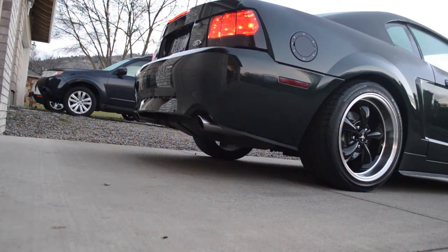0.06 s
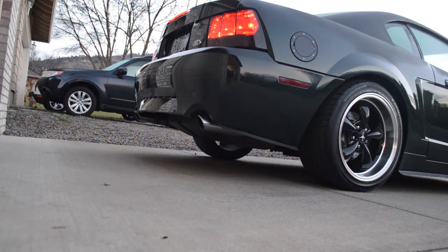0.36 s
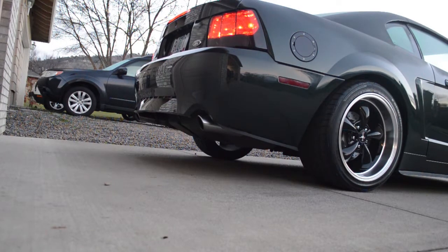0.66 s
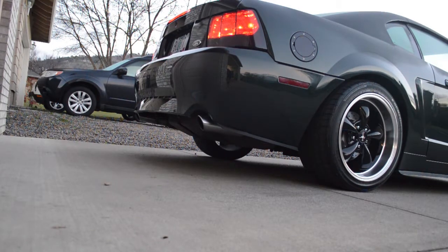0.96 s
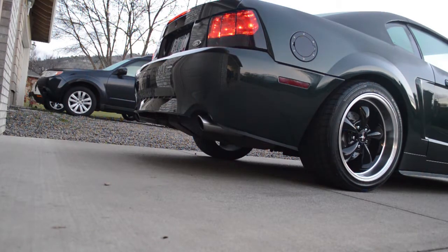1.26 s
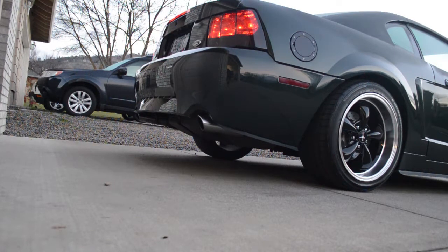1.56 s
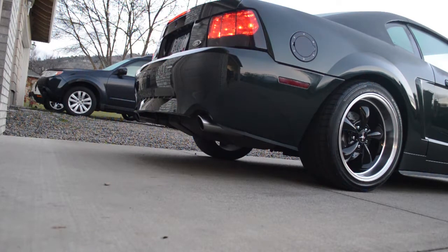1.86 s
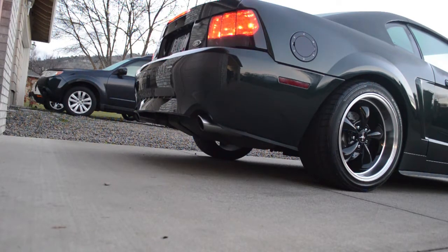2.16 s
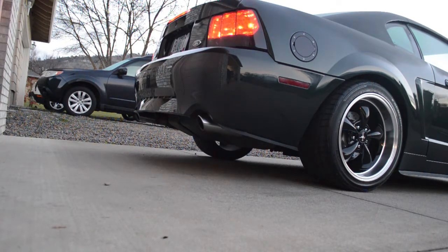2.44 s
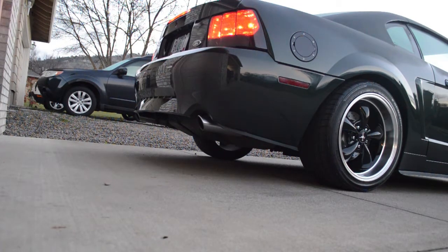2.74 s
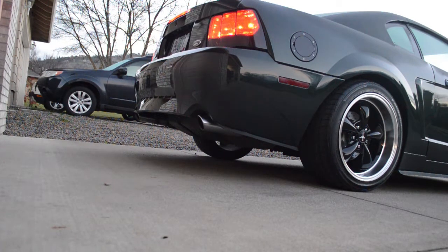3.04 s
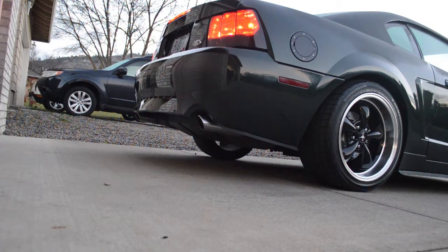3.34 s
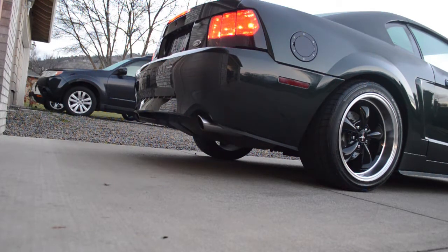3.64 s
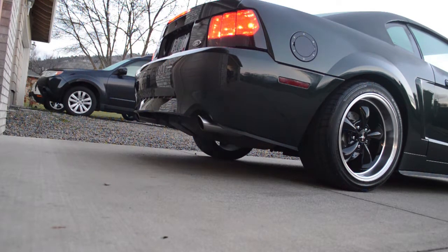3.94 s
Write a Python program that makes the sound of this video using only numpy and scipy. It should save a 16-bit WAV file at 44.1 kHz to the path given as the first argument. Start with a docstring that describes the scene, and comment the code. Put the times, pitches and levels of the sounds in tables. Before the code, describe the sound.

A V8 car engine starts, heard beside the tailpipe on a driveway. For the first second a faint fuel pump whines in quiet air. At 1 second the starter clacks in and grinds. Near 1.8 seconds the engine catches with a metallic rattle, barks loudly at 2.1 and flares with a few pops. From about 3 seconds it settles into a loud, lumpy idle until 4 seconds.

```python
"""A V8 car's cold start

Beside the tailpipe, on a driveway, the fuel pump whines. The starter slams in and its gear teeth grind
against each compression (a piston squeezing air). The engine catches with a metallic rattle and a bark,
flares roughly and settles into a loud, lumpy idle as eight unequal cylinders puff through the pipe."""
import sys
import numpy as np
from scipy import signal
from scipy.fft import rfft, irfft, next_fast_len
from scipy.io import wavfile
from scipy.ndimage import uniform_filter1d, map_coordinates

SR = 44100
rng = np.random.default_rng(int(sys.argv[2]) if len(sys.argv) > 2 else 0)


def unload_wav(signal):
    """Save mono or channel-first audio to the path in sys.argv[1] as 16-bit WAV at rate SR, clipped to [-1, 1]."""
    wavfile.write(
        sys.argv[1],
        SR,
        np.round(np.clip(np.atleast_2d(signal).T, -1, 1) * 32767).astype(np.int16),
    )


N = 176400
T = np.arange(N) / SR

# bright tone colour of struck engine metal: f/Hz, level/dB
METAL_COLOUR = [(2000, -5), (3500, -15), (4500, -2), (5100, -7.5), (6000, 0), (7400, -4.5), (9000, 1.5),
                (10200, -3.5), (11500, -9), (15500, -28)]


def amp(db):
    """Turn decibels into a gain."""
    return 10 ** (np.asarray(db) / 20)


def unit(x):
    """Scale to an average (rms) level of 1."""
    return x / np.sqrt(np.mean(x ** 2) + 1e-20)


def sine(turns):
    """A pure tone with one wave per turn."""
    return np.sin(2 * np.pi * turns)


def curve(rows, axis=1):
    """Follow one column of a table over time."""
    rows = np.array(rows)
    return np.interp(T, rows[:, 0], rows[:, axis])


def level(rows):
    """Gain from rows of t/s, level/dB, fading in just before the first."""
    return amp(curve(rows)) * np.clip((T - rows[0][0]) / .01 + 1, 0, 1)


def wobble(rate):
    """A smooth curve through `rate` random values a second."""
    return map_coordinates(rng.standard_normal(4000), [T * rate], mode="wrap")


def colour(x, points):
    """Filter a sound to the tone colour given by rows of f/Hz, level/dB."""
    size = 2 * next_fast_len(N // 2 + 8192)
    f, db = np.transpose(points)
    hz = np.fft.rfftfreq(size, 1 / SR)
    log_response = irfft(np.log(amp(np.interp(np.log(hz + 1), np.log(f + 1), db))))
    # make the filter ring after each hit, never before
    log_response[1:size // 2] *= 2
    log_response[size // 2 + 1:] = 0
    return irfft(rfft(x, size) * np.exp(rfft(log_response)))[:N]


def noise(points):
    """Noise of the given tone colour, at an average level of 1."""
    return unit(colour(rng.standard_normal(N), points))


def steady(x, span_s=0.27):
    """Even out slow changes in loudness."""
    power = np.abs(uniform_filter1d(uniform_filter1d(x * x, int(span_s * SR)), int(span_s * SR / 2)))
    return x / np.sqrt(power + power.mean() / 1000)


def beats(turns):
    """The samples at which a running count passes a whole number."""
    return np.flatnonzero(np.diff(np.floor(turns)) > 0)


def pulses(at, sizes):
    """Sharp clicks that may fall between samples."""
    taps = np.floor(at).astype(int)[:, None] + np.arange(-7, 9)
    offset = taps - at[:, None]
    clicks = sizes[:, None] * np.sinc(offset) * np.sinc(offset / 8)
    return np.bincount(np.clip(taps, 0, N).ravel(), clicks.ravel(), N + 1)[:N]


def blows(rows, fade_s, attack_s=.001):
    """Gain of sudden hits that each die away by 60 dB in fade_s."""
    ages = [(np.maximum(T - s, 0), db) for s, db in rows]
    return np.sqrt(sum((amp(db - 60 * t / fade_s) * (1 - np.exp(-t / attack_s))) ** 2 for t, db in ages))


def fuel_pump(stop_s=.82):
    """The pump primes the engine with two sagging whines, a few steady tones and a hiss."""
    # its high and low whines: t/s, f/Hz, level/dB
    high_whine = [(0, 9650, -53), (.2, 9400, -53), (.33, 8920, -56), (.5, 8650, -56), (.78, 7800, -76),
                  (.82, 7650, -90)]
    low_whine = [(0, 3150, -67), (.22, 3060, -62), (.45, 2900, -65), (.7, 2830, -71), (0.919, 2880, -59),
                 (1.05, 2880, -90)]
    # its steady tones and the colour of its hiss: f/Hz, level/dB
    steady_tones = [(2030, -68), (5980, -71), (8580, -63), (9570, -61)]
    hiss_colour = [(1470, -43), (2500, -19), (3060, -13), (3480, -20), (4450, -13), (7300, -8.5),
                   (7930, -4), (8550, 1), (9420, -1), (15000, -18)]
    whine = 0
    for rows in (high_whine, low_whine):
        pitch_hz = curve(rows) * (1 + 0.0184 * wobble(900))
        whine += amp(curve(rows, axis=2)) * sine(np.cumsum(pitch_hz) / SR)
    tones = sum(amp(db + 2 * wobble(11)) * np.sin(2 * np.pi * hz * T + wobble(200))
                for hz, db in steady_tones)
    running = np.clip((stop_s - T) / .03, 0, 1)
    return whine + (amp(-54) * noise(hiss_colour) + tones) * running


def yard(hum_hz=144):
    """Quiet outdoor air with a low hum."""
    # colour of the air: f/Hz, level/dB
    air_colour = [(15, -36), (25, -14), (112, -9.5), (150, -9.5), (293, -14.5), (335, -18), (427, -15),
                  (501, -19), (1910, -24), (2430, -29.5), (2850, -26), (3630, -31.5), (15000, -38.5)]
    hum = amp(-47.5 + 0.2 * wobble(8)) * (sine(hum_hz * T) + amp(-13.5) * sine(2 * hum_hz * T))
    return hum + amp(-50.5) * noise(air_colour)


def recorder_tone(recorder_tone_hz=15670):
    """A faint, thin, high electronic tone from the recorder, dropping away as the starter engages."""
    # the tone: t/s, level/dB
    recorder_tone_level = [(0, -55), (.3, -56), (1.0, -56), (1.1, -91), (4, -75)]
    return level(recorder_tone_level) * sine(recorder_tone_hz * T)


def starter():
    """The starter's small gear slams in, then its teeth strike and scrape the engine's big ring gear."""
    # the magnetic switch hits, then the small gear: t/s, level/dB
    engage_hits = [(1.0215, -18), (1.0335, -4)]
    # colours of those hits and of the metal housing: f/Hz, level/dB
    clash_colour = [(88, -58), (150, -13.5), (263, -9.5), (462, -41), (736, -24), (1370, -3.5),
                    (1870, -0.5), (3350, -11), (3620, -14.5), (8330, -11), (15500, -29.5)]
    housing_colour = [(88, -47), (150, -15.5), (217, -8), (258, -16), (332, -4), (359, -13), (453, -19),
                      (860, 0.5), (1340, -3), (1760, 1), (2140, -4), (2700, -3), (2920, -7.5),
                      (3910, -10.5), (6230, -13.5), (9540, -16.5), (15500, -37)]
    # how often the teeth meet: t/s, f/Hz
    tooth_rate = [(1.04, 188), (1.1, 244), (1.17, 296), (1.23, 256), (1.28, 246), (1.32, 338), (1.37, 330),
                  (1.42, 296), (1.48, 338), (1.55, 330), (1.6, 390), (1.66, 365), (1.71, 422), (1.9, 424)]
    # grinding that swells at each compression, motor groan and gear whine: t/s, level/dB
    grind_level = [(1.02, -59), (1.032, -19.5), (1.07, -17), (1.12, -17), (1.24, -14.5), (1.305, -18.5),
                   (1.35, -12.5), (1.4, -17), (1.44, -21.5), (1.462, -13.5), (1.518, -14), (1.56, -23.5),
                   (1.582, -13), (1.642, -17), (1.665, -22.5), (1.686, -14), (1.726, -14.5), (1.77, -21.5),
                   (1.87, -26), (2.0, -34), (2.2, -63)]
    groan_level = [(1.03, -60), (1.12, -26), (1.23, -19.5), (1.29, -29), (1.35, -19.5), (1.45, -33),
                   (1.53, -21), (1.6, -44), (1.71, -27), (1.8, -45), (1.9, -95)]
    whine_level = [(1.05, -40), (1.1, -33), (1.17, -33), (1.25, -23), (1.32, -34), (1.8, -38), (1.9, -99)]
    turns = np.cumsum(curve(tooth_rate) * (1 + .012 * wobble(70))) / SR
    at = beats(turns)
    early_late, size_db = rng.standard_normal((2000, 2))[:len(at)].T
    teeth = pulses(at + early_late * SR * .00005, amp(size_db))
    scrape = rng.standard_normal(N) * amp(1.2 * np.cos(2 * np.pi * turns) + 0.67 * wobble(250))
    groan = level(groan_level) * sine(turns)
    whine = level(whine_level) * amp(1.3 * wobble(60)) * (sine(10 * turns) + .5 * sine(6 * turns))
    gears = amp(-10.5) * unit(colour(teeth, housing_colour))
    gears += amp(-1.5) * unit(colour(scrape, housing_colour))
    gears += amp(-6) * housing_ring(unit(teeth) + unit(scrape))
    clash = noise(clash_colour) + amp(-13) * housing_ring(rng.standard_normal(N))
    return level(grind_level) * gears + groan + whine + blows(engage_hits, fade_s=.13) * clash


def housing_ring(x):
    """The metal housing around the starter and its gears rings at two pitches when shaken."""
    # its ringing notes: f/Hz, width/Hz, level/dB
    notes = [(856, 264, 5), (1542, 84, 14.5)]
    f = np.fft.rfftfreq(N, 1 / SR)
    response = sum((-1) ** k * amp(db) * 1j * f * width / (hz * hz - f * f + 1j * f * width)
                   for k, (hz, width, db) in enumerate(notes))
    return unit(irfft(rfft(x) * response, N))


def chuff():
    """The turning engine pushes air out of the pipe with a deep huff."""
    # the rush of air: t/s, level/dB
    air_level = [(1.1, -50), (1.35, -37.5), (1.76, -44), (1.83, -19), (1.92, -9), (1.98, -19), (2.14, -45),
                 (2.22, -66)]
    # its colour: f/Hz, level/dB
    air_colour = [(15, -36), (32, -16), (52, -3), (75, -12), (106, 4), (130, -4), (160, -22), (400, -50)]
    return level(air_level) * noise(air_colour)


def exhaust(firings):
    """Eight unequal cylinders send pulses down the pipe, which rumbles, barks, booms and drones."""
    # the cylinders in firing order: strength/dB, travel time to the tailpipe/ms
    cylinders = [(3, 5.05), (-1.8, 2.194), (-1.5, 1.71), (3, 2.55), (1.5, 3.615), (0.8, 1.97), (-2.5, 5.08),
                 (3.5, 0.71)]
    # how much the firings vary at random: t/s, spread/dB
    unevenness = [(1.8, 3.5), (2.2, 2.5), (2.4, 2.6), (2.6, 7.5), (3.0, 4.5), (3.25, 3.7)]
    # colours of the pipe and the bark: f/Hz, level/dB
    pipe_colour = [(20, -56), (40, -13), (58, -4.5), (85, -16.5), (115, 6), (150, -14), (205, 7.5),
                   (255, -2), (300, 4.5), (340, -5.5), (385, 3), (450, -13.5), (497, -5), (540, -20),
                   (615, -17), (740, -45), (850, -20), (1000, -38.5), (1600, -53), (4000, -96)]
    bark_colour = [(25, -72), (150, -41), (400, 3), (620, 9), (760, 6), (850, 3), (1050, -6.5),
                   (1500, -7.5), (2200, -22), (3000, -26), (5000, -43)]
    # the pipe's four sounds: t/s, level/dB
    rumble_level = [(1.78, -56), (1.84, -21), (1.9, -23), (1.97, -15), (2.05, -15.5), (2.15, -16.5),
                    (2.25, -20), (2.45, -18), (2.55, -20.5), (2.65, -19.5), (2.73, -20.5), (2.78, -21),
                    (2.86, -20), (2.92, -16), (2.98, -25), (3.04, -17), (3.1, -22), (3.3, -20), (3.5, -18),
                    (4.0, -19)]
    bark_level = [(1.82, -48), (1.92, -17), (2.01, -27.5), (2.09, -17), (2.125, -12), (2.17, -13),
                  (2.21, -28), (2.3, -24.5), (2.45, -26), (2.56, -26.5), (2.62, -33), (2.79, -38),
                  (2.9, -32), (2.97, -41), (3.15, -39), (3.27, -36.5), (4.0, -39)]
    boom_level = [(2.0, -33), (2.06, -23), (2.12, -13), (2.17, -13.5), (2.25, -16), (2.42, -16.5),
                  (2.6, -15.5), (2.76, -19.5), (2.9, -16.5), (3.0, -25), (3.15, -30)]
    drone_level = [(2.9, -64), (3.1, -23), (3.3, -22.5), (3.55, -16.5), (4, -18)]
    at = beats(firings)
    size_db, lag_ms = np.array(cylinders)[np.arange(len(at)) % len(cylinders)].T
    early_late, extra_db = rng.standard_normal((600, 2))[:len(at)].T * curve(unevenness)[at]
    train = pulses(at + (lag_ms + 0.075 * early_late) * SR / 1000, amp(size_db + extra_db))
    low_cut = signal.butter(4, 20.5, "high", fs=SR, output="sos")
    piped = signal.sosfilt(low_cut, colour(muffler(train), pipe_colour))
    rumble = amp(2) * level(rumble_level) * steady(piped)
    puffs = signal.lfilter([1], [1, -np.exp(-1 / (0.007 * SR))], train)  # each pulse gets a 7 ms tail
    crack = steady(colour(train, bark_colour))
    rasp = steady(colour(puffs * rng.standard_normal(N), bark_colour))
    bark = level(bark_level) * (amp(-5) * crack + amp(-1) * rasp)
    boom = pipe_tone(rumble, firings, level(boom_level)) * amp(0.59 * wobble(30.44))
    cycles = firings / len(cylinders)
    drone = pipe_tone(rumble, 10 * cycles, level(drone_level))
    return rumble + bark + boom + drone


def muffler(x):
    """Sound bounces inside the muffler, which smears each pulse without changing its colour."""
    # its chambers: round trip/ms, share reflected
    chambers = [(3.1, 0.59), (9.4, 0.46)]
    size = next_fast_len(N + 8192)
    spectrum = rfft(x, size)
    for trip_ms, reflection in chambers:
        delay = np.exp(-2j * np.pi * np.fft.rfftfreq(size, 1 / SR) * trip_ms / 1000)
        spectrum *= (delay - reflection) / (1 - reflection * delay)
    return irfft(spectrum, size)[:N]


def pipe_tone(rumble, turns, gain):
    """A pipe tone, lined up with the same pitch in the rumble so that the two add up."""
    tone = np.exp(2j * np.pi * turns)
    phase = np.angle(np.sum(gain * rumble / tone))
    return gain * np.real(tone * np.exp(1j * phase))


def loose_metal(throb):
    """Loose metal rattles as the engine catches."""
    # single rattles and the chatter between them: t/s, level/dB
    rattle_hits = [(1.822, -16), (1.861, -11), (1.888, -6), (1.913, -10), (1.929, -17.5), (1.978, -13.5),
                   (2.017, -21), (2.117, -8.5), (2.134, -27), (2.163, -42)]
    chatter_level = [(1.78, -30), (1.83, -18), (1.92, -29), (1.95, -30), (2.0, -23.5), (2.05, -25),
                     (2.1, -30), (2.14, -23), (2.22, -50.5)]
    rattle = blows(rattle_hits, fade_s=0.058, attack_s=0.0017) * noise(METAL_COLOUR)
    chatter = unit(noise(METAL_COLOUR) * amp(2.2 * throb + 2.2 * wobble(200)))
    return rattle + level(chatter_level) * chatter


def engine_bay(throb):
    """The air intake hisses while the valves tick and sizzle."""
    # single ticks, intake hiss and valve sizzle: t/s, level/dB
    tick_hits = [(2.4783, -37), (2.5471, -33.5), (2.6793, -31), (2.7237, -34), (2.824, -29.5),
                 (2.9851, -36), (3.0325, -34)]
    hiss_level = [(1.9, -62), (2.15, -42), (2.6, -40.5), (2.82, -39.5), (2.95, -42), (3.1, -38.5),
                  (3.25, -34), (3.45, -34), (3.7, -38), (4, -36.5)]
    sizzle_level = [(1.95, -64), (2.2, -40), (2.35, -50), (2.6, -44), (2.95, -64), (3.4, -45.5),
                    (3.65, -59), (4, -67.5)]
    # colour of the hiss: f/Hz, level/dB
    hiss_colour = [(600, -7.5), (1000, 2), (1440, -1), (1820, 2), (3500, -8.5), (5000, -12), (5600, -10.5),
                   (9000, -17.5), (12500, -60), (15500, -57)]
    ticks = amp(-1.5) * blows(tick_hits, fade_s=0.054) * noise(METAL_COLOUR)
    hiss = level(hiss_level) * unit(noise(hiss_colour) * amp(0.5 * throb + 0.74 * wobble(150)))
    sizzle = level(sizzle_level) * unit(noise(METAL_COLOUR) * amp(2 * throb + 1.3 * wobble(200)))
    return ticks + hiss + sizzle


def bangs(throb):
    """Unburnt fuel lights in the pipe with a blast, then a few hard firings pop."""
    # the blast and the pops: t/s, level/dB
    blast_level = [(2.06, -34), (2.08, -46), (2.105, -48), (2.118, -15.5), (2.14, -18.5), (2.165, -14.5),
                   (2.19, -25), (2.24, -47), (2.3, -87)]
    pop_hits = [(2.336, -13.5), (2.518, -20), (2.547, -10.5), (2.681, -29.5), (2.826, -37), (2.913, -17.5),
                (3.031, -29)]
    # their colours: f/Hz, level/dB
    blast_colour = [(30, -64), (200, -7), (380, 2.5), (650, -17), (1000, -3), (1400, -4.5), (1900, -12),
                    (2600, -25), (5000, -40)]
    pop_colour = [(25, -55), (100, -5), (300, 1), (620, 3.5), (1000, -6.5), (1500, -13.5), (2500, -26),
                  (5000, -56)]
    pops = blows(pop_hits, fade_s=0.048, attack_s=0.00091) * noise(pop_colour)
    blast = level(blast_level) * unit(noise(blast_colour) * amp(4.5 * throb))
    return blast + pops


def wall_echo(x, delay_s=.006, fade_s=0.053):
    """The house wall throws back a short, blurred echo."""
    t = T[:SR // 3]
    tail = rng.standard_normal(len(t)) * amp(-60 * t / fade_s) * (t > delay_s)
    return signal.fftconvolve(x, tail / np.linalg.norm(tail))[:N]


def scene():
    """Mix all the sounds; only the machinery echoes off the wall."""
    # engine speed as firings per second: t/s, f/Hz
    firing_rate = [(1.0, 2), (1.3, 8), (1.78, 11), (1.83, 40), (1.92, 68), (2.0, 97), (2.12, 106),
                   (2.22, 123), (2.31, 131.5), (2.41, 134.5), (2.5, 130), (2.6, 121), (2.7, 112),
                   (2.9, 99.5), (3.02, 93), (3.25, 88.3), (3.5, 86.5), (4.0, 84.4)]
    firings = np.cumsum(curve(firing_rate)) / SR  # running count
    throb = np.cos(2 * np.pi * firings)  # one swell per firing
    machinery = starter() + loose_metal(throb) + engine_bay(throb)
    echo = amp(-9) * wall_echo(machinery)
    tailpipe = exhaust(firings) + bangs(throb) + chuff()
    return (machinery + echo + tailpipe + fuel_pump() + yard() + recorder_tone())[None]


def record(dry):
    """Round off the loudest peaks and cut the very highest treble."""
    ceiling, top_hz = 1.05, 15750
    rounded = dry / (1 + np.abs(dry / ceiling) ** 6) ** (1 / 6)
    size = next_fast_len(N + 8192)
    return irfft(rfft(rounded, size) * (np.fft.rfftfreq(size, 1 / SR) < top_hz), size)[:, :N]


dry = scene()
out = record(dry)
unload_wav(out)
```